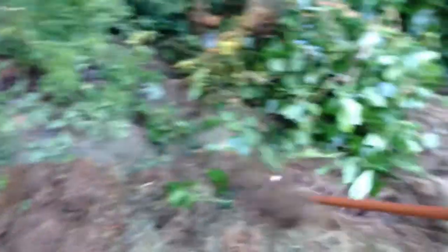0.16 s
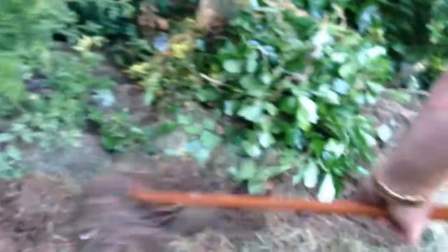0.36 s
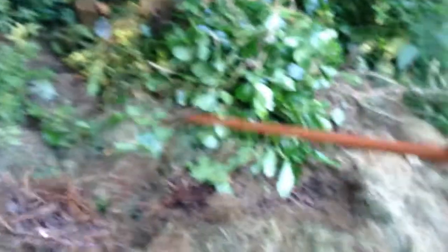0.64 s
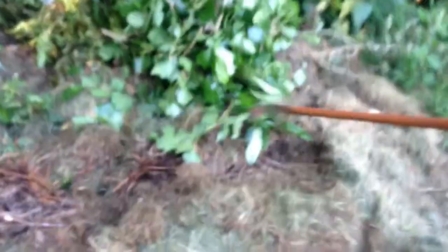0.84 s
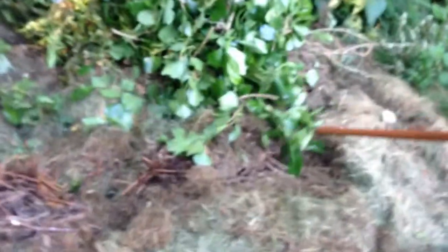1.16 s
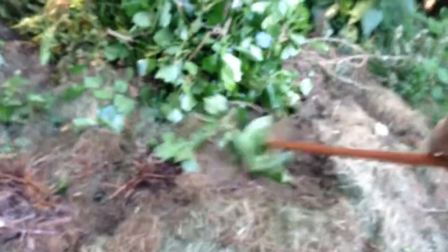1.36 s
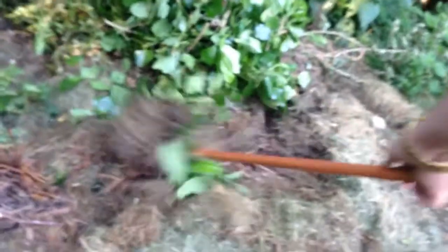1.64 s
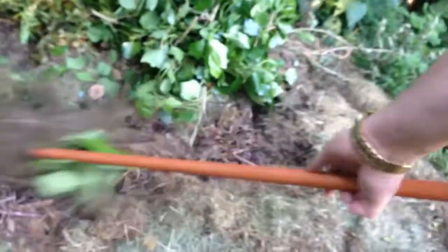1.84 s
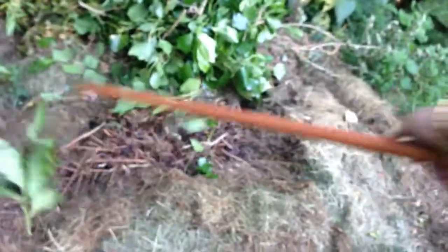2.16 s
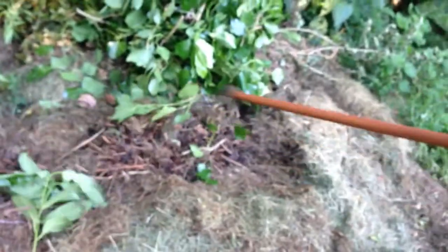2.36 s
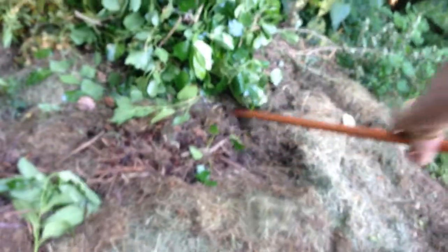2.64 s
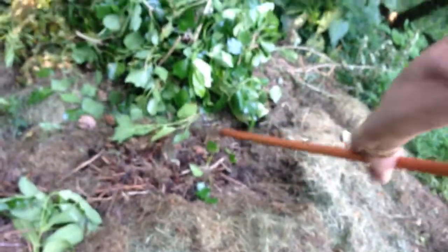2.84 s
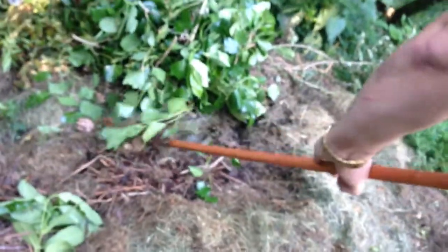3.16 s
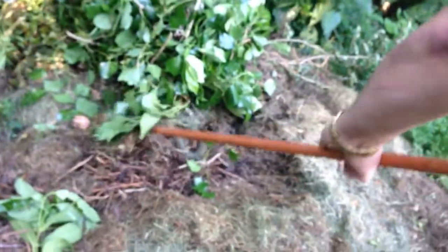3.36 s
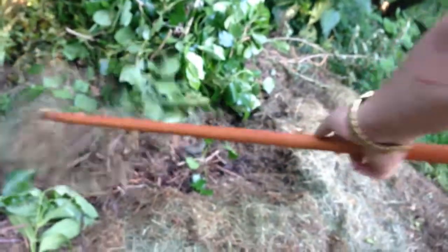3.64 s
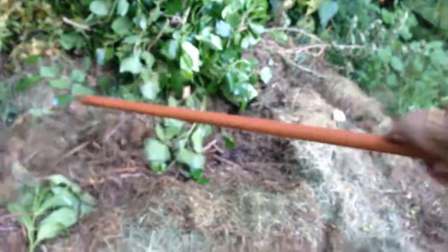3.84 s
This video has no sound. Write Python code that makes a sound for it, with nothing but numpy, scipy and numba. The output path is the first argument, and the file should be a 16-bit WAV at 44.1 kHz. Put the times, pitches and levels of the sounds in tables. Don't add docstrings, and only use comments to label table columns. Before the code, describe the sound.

A garden tool rustles and scrapes through leafy cuttings and dry stalks, with sharp twig snaps.

```python
import sys
import numpy as np
from scipy import signal
from scipy.fft import rfft, irfft
from scipy.io import wavfile
from scipy.ndimage import uniform_filter1d
from numba import njit

SR = 44100
rng = np.random.default_rng(int(sys.argv[2]) if len(sys.argv) > 2 else 0)


def gain_from_db(level_db):
    decades = np.asarray(level_db, float) / 20
    return 10 ** decades


def pcm_store(signal):
    levels = np.round(np.clip(np.atleast_2d(signal), -1, 1) * 32767)
    wavfile.write(sys.argv[1], SR, levels.astype(np.int16).T)


N = 176400
TIME_S = np.arange(N) / SR
FREQ_HZ = np.fft.rfftfreq(N, 1 / SR)


def set_rms(x, db):
    return x * gain_from_db(db) / np.sqrt(np.mean(x ** 2))


def read_spectrum(table, hz):
    table_hz, db = np.array(table, float).T
    return np.interp(np.log(hz), np.log(table_hz), db)


def slow_walk(rate):
    hold = int(SR / rate)
    steps = np.repeat(rng.standard_normal(N // hold + 1), hold)
    smooth = uniform_filter1d(uniform_filter1d(steps, hold), hold)
    return 1.06 * smooth[:N]


@njit
def ring(n, start, hz, t60, size, sr):
    y = np.zeros(n)
    for k in range(len(start)):
        turn = np.exp(2j * np.pi * hz[k] / sr - np.log(1000) / (t60[k] * sr))
        phasor = size[k] + 0j
        first = max(int(start[k] * sr), 0)
        for j in range(first, min(n, first + int(t60[k] * sr))):
            y[j] += phasor.imag
            phasor *= turn
    return y


def damped_tones(s, hz, t60, size):
    shared = np.broadcast_arrays(s, hz, t60, size)
    s, hz, t60, size = (np.ascontiguousarray(v, float).ravel() for v in shared)
    return ring(N, s, np.clip(hz, 20, SR / 2.3), np.clip(t60, 1e-4, 1), size, 1. * SR)


# (frequency [Hz], density [dB per Hz])
AIR_COLOUR = [(30, -17), (60, -0.5), (90, -5.5), (180, -4.5), (300, -11.5), (1000, -15), (1600, -20.5),
              (15500, -25.5)]
# (time [s], drone level [dB], deep rumble level [dB])
FAR_DRONE = [
    (0, 3, 6),
    (.12, -1.5, -14),
    (.4, 0, -6),
    (.6, 1.5, 0),
    (1.1, 0.5, 3),
    (1.5, -2.5, 0),
    (2.8, -5.5, -0.5),
    (3.2, 1.5, -2),
    (3.6, -3, 3.5),
    (4, -2, 3),
]
AIR_DB, RUMBLE_SWELL_DB, AIR_FLICKER_DB = -60.5, 3.5, 3


def distant_air():
    out, swell = 0, slow_walk(2.18)
    s, *rows = np.array(FAR_DRONE).T
    drone_db, deep_db = (np.interp(TIME_S, s, row) for row in rows)
    f = FREQ_HZ + 1
    for hz in 25 * 2 ** np.arange(0, 9.6, .5):
        shape = np.clip(1 - np.abs(2 * np.log2(f / hz)), 0, 1) ** .5
        band = irfft(rfft(rng.standard_normal(N)) * shape * gain_from_db(read_spectrum(AIR_COLOUR, f)), N)
        bass_share = np.clip(150 / hz, 0, 1)
        db = RUMBLE_SWELL_DB * (swell / 4 + slow_walk(7.45)) * bass_share
        db = db + AIR_FLICKER_DB * slow_walk(18)
        db = db + drone_db * (90 < hz < 250) + deep_db * (hz < 90)
        out = out + band * gain_from_db(db)
    return set_rms(out, AIR_DB)


# (time [s], level [dB], frequency [Hz])
GRIP_THUDS = [(0.125, -44, 166), (0.276, -43, 178), (0.427, -59, 182), (0.535, -55, 180), (3.545, -52, 181),
              (0.55, -47.5, 66.4), (0.859, -49, 118), (1.02, -47, 85), (1.099, -51, 63.6),
              (1.268, -54, 70.6), (1.403, -92, 78.1), (2.168, -55, 65), (2.792, -50, 67.6),
              (2.964, -54.5, 88.8), (3.297, -49, 84.5), (3.736, -46.5, 72.4), (3.849, -54.5, 78),
              (3.92, -49, 76)]
THUD_CYCLES = 11


def grip_thuds():
    s, db, hz = np.array(GRIP_THUDS).T
    return uniform_filter1d(damped_tones(s + 0.0071, hz, THUD_CYCLES / hz, gain_from_db(db)), size=100)


# (time [s], peak level [dB], frequency [Hz], t60 [s])
DULL_TAPS = [
    (.448, -36.5, 800, .012),
    (.784, -42.5, 510, 0.019),
    (1.739, -43, 720, 0.0094),
    (3.026, -45.5, 650, 0.02),
    (3.848, -50.5, 1030, 0.017),
]


def dull_taps():
    s, db, hz, t60 = np.array(DULL_TAPS).T
    return damped_tones(s, hz, t60, -gain_from_db(db))


# (frequency [Hz], level [dB], t60 [s])
HEAD_MODES = [(1190, -24, 0.016), (1475, -5.5, 0.034), (1860, -4, 0.029), (2300, -0.5, 0.016),
              (3500, 1, 0.0089), (3940, -3.5, 0.026)]
# (time [s], peak level [dB], extra level of low modes [dB])
HEAD_KNOCKS = [(0.2763, -42, -1), (0.8312, -44, 0.5), (0.9327, -38, 1), (1.0894, -47, -5),
               (1.5959, -38, -5), (2.902, -55, 6), (3.2265, -47, -3), (3.2843, -46, 2), (3.4346, -34, 0.5),
               (3.5014, -32.5, -7), (3.6416, -48, 3.5), (3.6493, -46.5, 0)]


def head_knocks():
    s, db, low_db = np.array(HEAD_KNOCKS).T[..., None]
    hz, mode_db, t60 = np.array(HEAD_MODES).T
    detune, uneven = rng.standard_normal((2, len(s), len(hz)))
    blow_db = db + 1.5 + mode_db + low_db * (hz < 2600) + 2.36 * uneven
    x = damped_tones(s + 0.00095, hz * (1 + 0.055 * detune), t60, gain_from_db(blow_db))
    return signal.sosfilt(signal.butter(2, 900, "high", fs=SR, output="sos"), x)


def breaks(table, ms, octaves):
    length, lead = 2048, 64
    lag_s, trim_db = .0014, -.5
    out, t = np.zeros(N + length), np.arange(length) / SR
    f = np.fft.rfftfreq(length, 1 / SR) + 1
    for s, db, hz in table:
        fibres = np.append(3, rng.standard_normal(length - 1))
        spectrum = rfft(np.roll(fibres * gain_from_db(-60000 * t / ms), lead))
        even = spectrum / np.sqrt(uniform_filter1d(np.abs(spectrum) ** 2, size=40))
        burst = irfft(even * np.exp(-.5 * (np.log2(f / hz) / octaves) ** 2))
        i = int((s + lag_s) * SR) - lead
        out[i:i + length] += burst * gain_from_db(db + trim_db) / np.abs(burst).max()
    return out[:N]


# (time [s], peak level [dB], centre [Hz])
TWIG_SNAPS = [(0.135, -29, 6500), (0.7815, -33.5, 7700), (0.8783, -37.5, 5680), (0.9741, -38, 5200),
              (1.054, -40, 4950), (1.0685, -30.5, 4100), (1.0888, -33.5, 3740), (1.4535, -29, 7900),
              (1.516, -33, 7700), (1.5952, -20, 6260), (2.155, -37, 8200), (2.3629, -36.5, 5630),
              (2.4677, -41, 6500), (2.7336, -37, 6600), (2.9814, -26, 6160), (3.0024, -29, 5630),
              (3.0054, -22, 7110), (3.0174, -27, 8180), (3.0234, -26, 4700), (3.1307, -35, 7900),
              (3.226, -21, 5900), (3.3347, -27, 6600), (3.4998, -10, 5500), (3.64, -29, 6200),
              (0.6806, -41, 6400), (.692, -50, 8000), (0.7177, -46, 5000), (.6, -51, 11000),
              (.9695, -40, 8000), (.991, -39, 7000), (.998, -43, 5000), (1.0045, -41, 5500),
              (1.015, -44, 5000), (1.043, -42, 5000), (1.288, -50, 5300), (1.431, -39, 7000),
              (1.501, -36, 8000), (1.5609, -35, 5500), (1.584, -32, 7000), (1.879, -39, 6000),
              (1.925, -39, 6500), (2.0562, -44, 5370), (2.078, -37, 5000), (2.1083, -38.5, 3900),
              (2.118, -54, 6500), (2.136, -44, 6200), (2.21, -47, 7500), (2.257, -44, 7000),
              (2.399, -47.5, 3020), (2.708, -42, 7500), (2.7745, -38.5, 4000), (2.795, -47, 10000),
              (2.8013, -37, 6000), (2.864, -43, 4500), (2.886, -39, 6000), (3.3218, -38, 6000),
              (3.428, -29, 9000)]


def twig_snaps():
    return breaks(TWIG_SNAPS, ms=6, octaves=.65)


# (time [s], peak level [dB], centre [Hz])
STALK_TEARS = [(0.0699, -28, 4340), (0.1794, -40, 4010), (0.8071, -42, 5420), (0.831, -31.5, 3660),
               (0.9167, -34.5, 3440), (0.9254, -34, 3960), (0.9323, -32, 3920), (0.9834, -33.5, 3770),
               (2.3094, -46, 3340), (2.3446, -40, 6700), (2.9861, -24.5, 4300), (3.0394, -30.5, 4400),
               (3.0833, -31, 8160), (3.1536, -28, 7400), (3.1644, -23.5, 6400), (3.434, -17.5, 3430),
               (3.4714, -30, 3620), (3.5254, -22, 4200), (3.5554, -26.5, 4550), (3.5914, -35, 4800),
               (3.8482, -42, 3960)]


def stalk_tears():
    return breaks(STALK_TEARS, ms=7, octaves=.45)


# (time [s], peak level [dB], centre [Hz])
BUNDLE_CRUNCHES = [
    (.9335, -38, 3850),
    (1.7388, -25, 6650),
    (2.1858, -39, 5800),
    (2.3, -46, 4530),
    (2.6995, -36, 6670),
    (3.5213, -24, 4260),
    (3.6514, -36, 5560),
]


def bundle_crunches():
    return breaks(BUNDLE_CRUNCHES, ms=31, octaves=0.62)


def heap_scatter(hits):
    t60_s, scatter_db = .05, -12
    t = np.arange(4000) / SR
    tail = rng.standard_normal(len(t)) * np.exp(-np.log(1000) * t / t60_s) * (t > .001)
    tail = tail / np.sqrt(np.sum(tail ** 2))
    return hits + gain_from_db(scatter_db) * signal.fftconvolve(hits, tail)[:N]


# (frequency [Hz], density [dB per Hz])
LEAF_COLOUR = [(700, -15.5), (1200, -11.5), (2000, -7.5), (2700, -6), (3300, -2.5), (7500, 1),
               (11000, -5.5), (15500, -7.5)]
CRACK_CYCLES, LOUDEST_DB = 5.8, 8


def leaf_cracks(per_s, spread_db, scatter_s, count):
    clusters = min(int(per_s * N / SR), 80000 // count)
    moment, strength = rng.random((2, clusters, 1))
    delay, pitch, sign = rng.random((3, clusters, count))
    at = moment * N / SR - scatter_s * np.log(1 - delay)
    hz = 2000 * 8 ** pitch
    db = 10 * np.log10(hz) + np.minimum(-spread_db * np.log(1 - strength), LOUDEST_DB)
    spectrum = rfft(damped_tones(at, hz, CRACK_CYCLES / hz, gain_from_db(db) * np.sign(sign - .5)))
    even = spectrum / np.sqrt(uniform_filter1d(np.abs(spectrum) ** 2, size=2000))
    return set_rms(irfft(even * gain_from_db(read_spectrum(LEAF_COLOUR, FREQ_HZ + 1)), N), 0)


# (time [s], pitch [Hz], boost [dB])
HOLLOW_PITCH = [(0, 2400, 10), (.12, 4740, 1), (.28, 3700, 8), (.4, 2930, -3.5), (.65, 2360, 15),
                (.92, 3670, 1.5), (1.1, 2560, 7), (1.4, 3500, 1.5), (1.75, 4000, 3), (2, 3300, 5.5),
                (2.4, 3280, 1), (2.9, 2300, 7.5), (3.02, 4200, 2.5), (3.25, 2040, 4.5), (3.52, 3920, 3.5),
                (4, 3800, 9)]
HOLLOW_OCTAVES, PATCHY_DB = 0.091, 2


def leaf_patches(x):
    spectrum, out = rfft(x), 0
    s, hz, db = np.array(HOLLOW_PITCH).T
    centre, boost_db = (np.interp(TIME_S, s, v) for v in (np.log2(hz), db))
    for octave in np.arange(9, 14.5, .25):
        shape = np.clip(1 - 4 * np.abs(np.log2(FREQ_HZ + 1) - octave), 0, 1)
        band = irfft(spectrum * shape, N)
        near = np.exp(-.5 * ((octave - centre) / HOLLOW_OCTAVES) ** 2)
        out = out + band * gain_from_db(PATCHY_DB * slow_walk(25.06) + boost_db * near)
    return out


# (peak time [s], level [dB], rise [s per 20 dB], fall [s per 20 dB], brightness [dB])
DRAG_SURGES = [(0.01, -56.5, 6, 0.12, -0.9), (.175, -45, 0.12, 0.19, 1), (.29, -48, 0.33, 0.33, -2),
               (.43, -53.5, .22, .14, .2), (.55, -66, .2, 0.2, -2), (.875, -57.5, 0.17, 0.2, -5),
               (.936, -54.5, .07, 0.2, -10), (.995, -56, 0.06, 0.14, -2.5), (1.085, -61, .07, .08, -1),
               (1.22, -66, .2, .2, -3), (1.366, -50, 0.12, 0.14, -3), (1.5, -56, .1, .1, 0),
               (1.6, -47.5, 0.15, 0.31, -0.2), (1.742, -46, .04, .028, .7), (1.75, -49.5, .3, .33, .2),
               (1.92, -49.5, 0.29, 0.16, -1), (2.07, -57, .15, .17, -1), (2.2, -59, .06, .12, .2),
               (2.33, -57.5, .12, .12, -.5), (2.44, -63.5, 0.15, .17, -1.5), (2.702, -56, .04, .05, .7),
               (2.77, -58.5, .12, .1, .2), (2.945, -50.5, .115, .12, 0)]
# (peak time [s], level [dB], rise [s per 20 dB], fall [s per 20 dB], brightness [dB])
LOAD_RIPS = [
    (2.99, -39, 0.02, 0.11, 1),
    (3.04, -43.5, 0.12, 0.13, 1),
    (3.16, -46, 0.056, 0.11, 0.9),
    (3.235, -44.5, 0.036, 0.097, 0.71),
    (3.34, -54, 0.02, 0.15, 1),
    (3.451, -41.5, 0.065, 0.094, -0.066),
    (3.502, -38, 0.024, 0.052, 0.94),
    (3.525, -38.5, 0.011, 0.07, 1),
    (3.65, -52.5, 0.14, 0.075, -1.5),
    (3.85, -56.5, 0.27, 0.15, -1.2),
]


def drag_effort():
    s, db, rise, fall, bright_db = np.array(DRAG_SURGES + LOAD_RIPS).T[..., None]
    late = np.arange(0, N + 63, 64) / SR - s
    slope = np.where(late < 0, rise, fall).clip(.02)
    db = db - 20 * (late / slope) ** 2
    gains = []
    for tilt in (-1, 1):
        power = np.sum(gain_from_db(db + tilt * bright_db) ** 2, axis=0)
        gains.append(np.repeat(np.sqrt(power), 64)[:N])
    return gains


def leaf_rustle():
    flutter_db, crackle_db, bright_hz = 0.5, -7.5, 4700
    dense = leaf_cracks(11000, spread_db=1.5, scatter_s=0, count=1) * gain_from_db(flutter_db * slow_walk(39.97))
    crackle = leaf_cracks(260, spread_db=3, scatter_s=.0007, count=10)
    x = leaf_patches(dense + gain_from_db(crackle_db) * crackle)
    dull = irfft(rfft(x) / (1 + (FREQ_HZ / bright_hz) ** 2), N)
    dull_gain, bright_gain = drag_effort()
    return dull * dull_gain + (x - dull) * bright_gain


def scene():
    background = distant_air()
    handle = grip_thuds() + dull_taps()
    hits = heap_scatter(head_knocks() + twig_snaps() + stalk_tears() + bundle_crunches())
    return (background + handle + hits + leaf_rustle())[None]


def low_pass(x):
    return signal.sosfilt(signal.butter(12, 16460, fs=SR, output="sos"), x)


def record(dry):
    no_bottom = signal.sosfilt(signal.butter(2, 40, "high", fs=SR, output="sos"), dry)
    mix = signal.sosfilt(signal.ellip(8, .2, 60, 15250, fs=SR, output="sos"), no_bottom)
    return low_pass(mix)


dry = scene()
out = record(dry)
pcm_store(out)
```